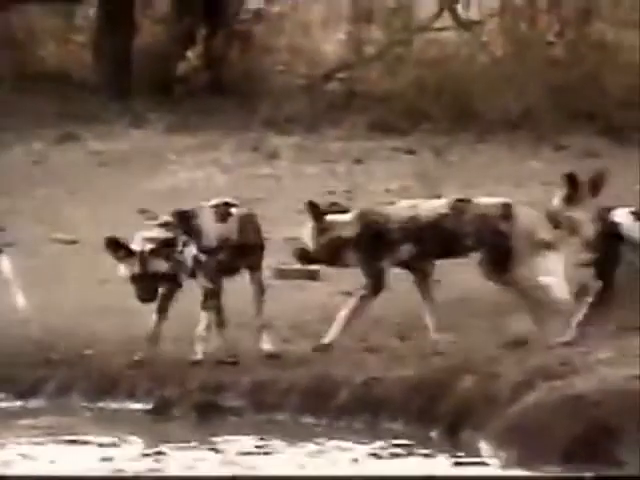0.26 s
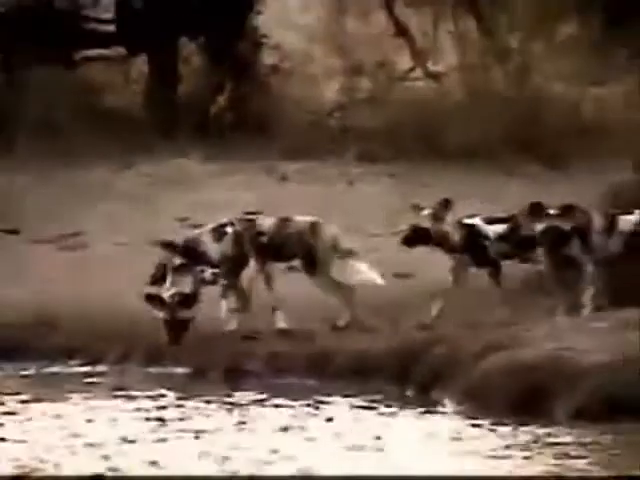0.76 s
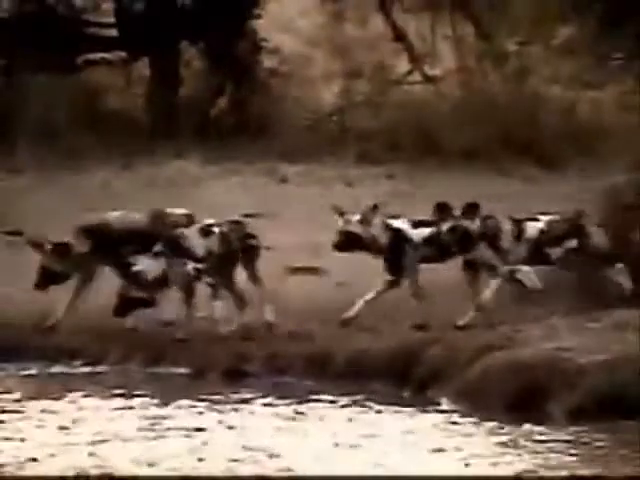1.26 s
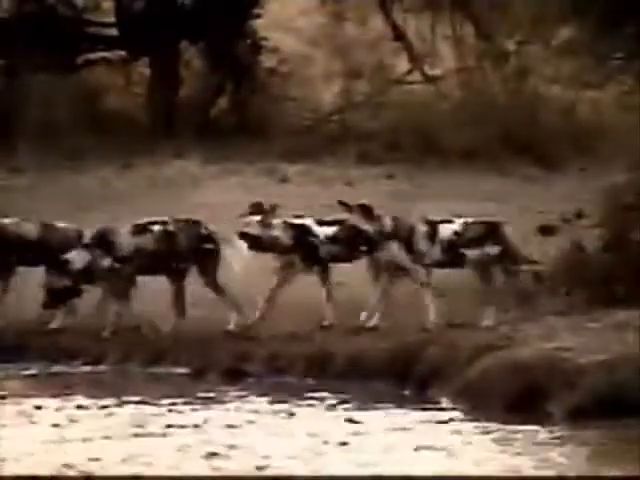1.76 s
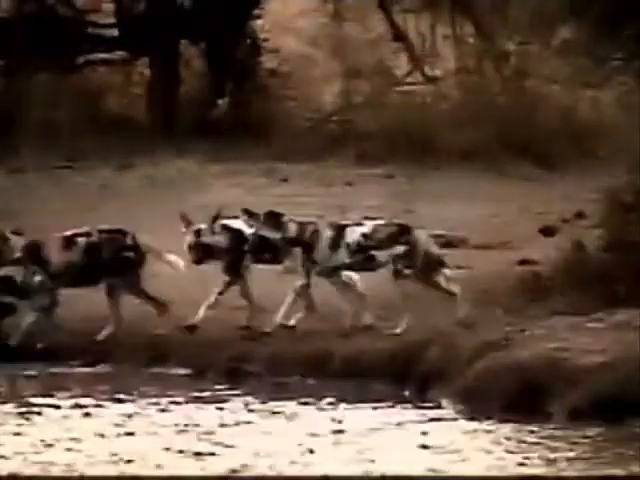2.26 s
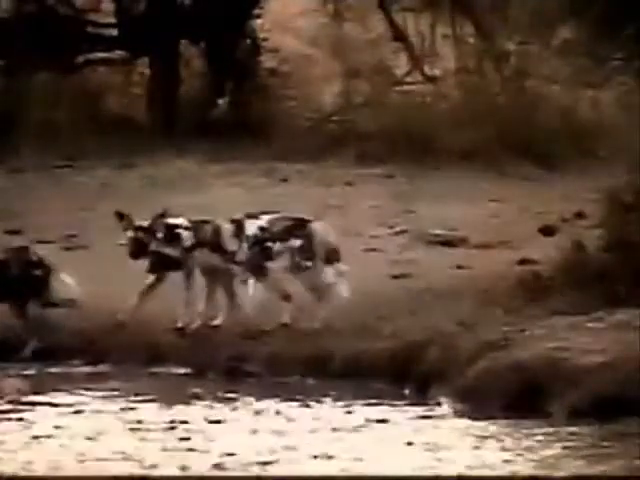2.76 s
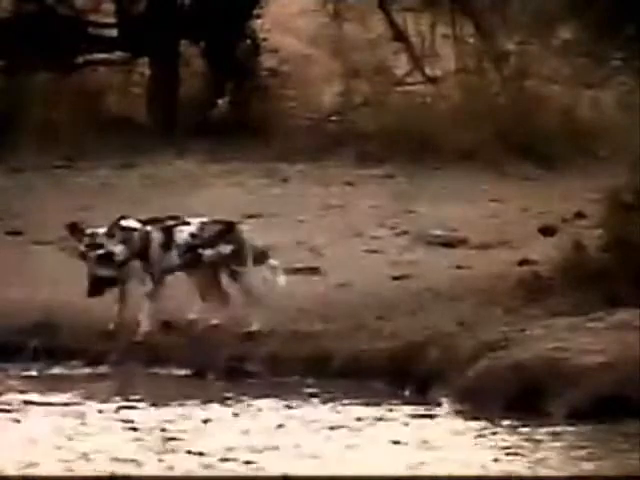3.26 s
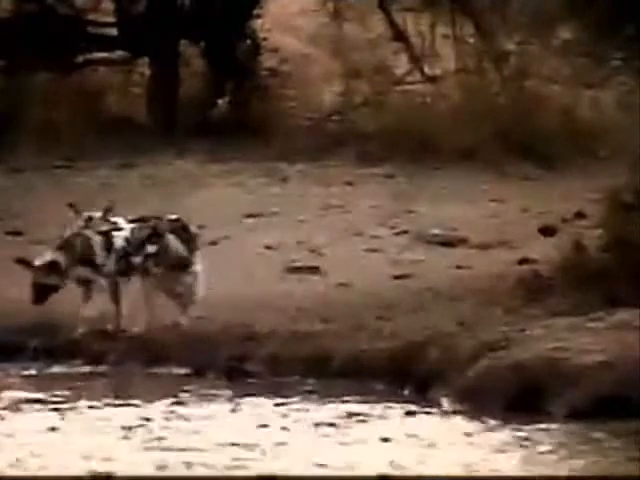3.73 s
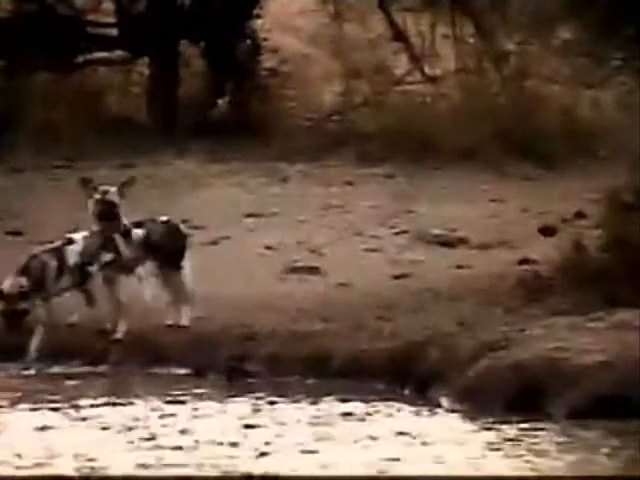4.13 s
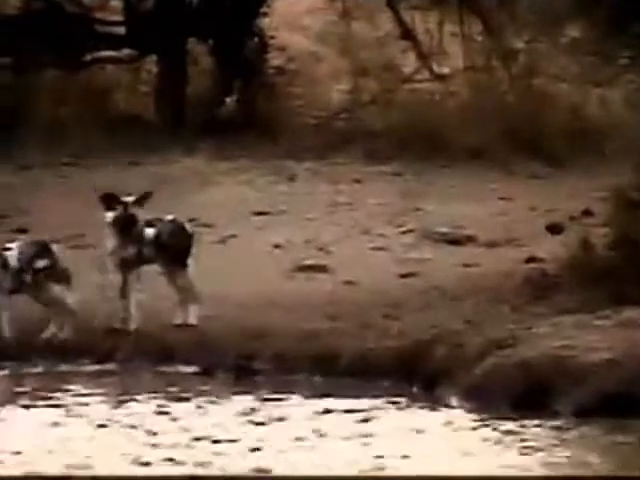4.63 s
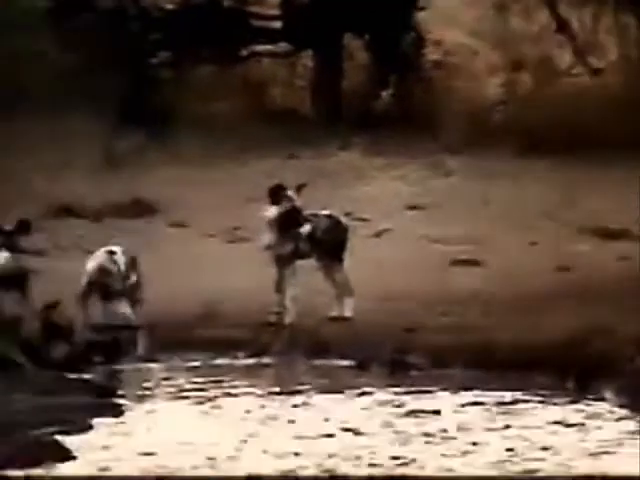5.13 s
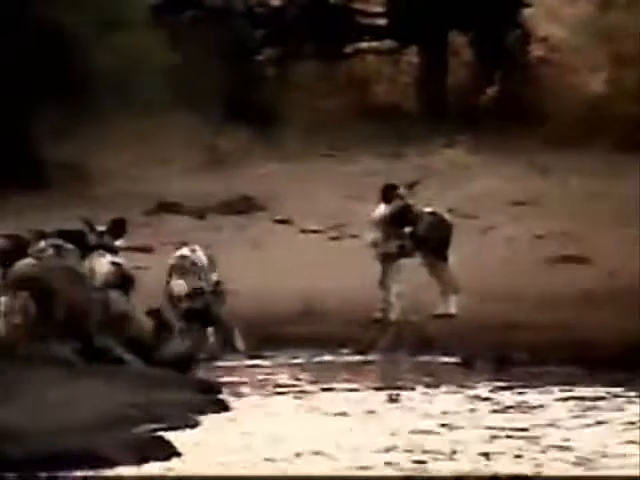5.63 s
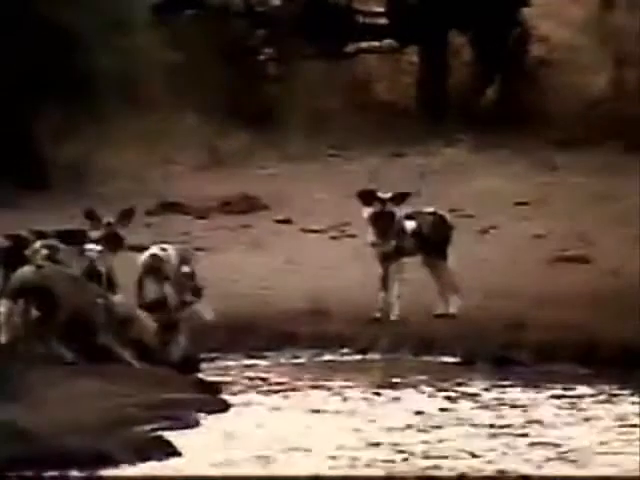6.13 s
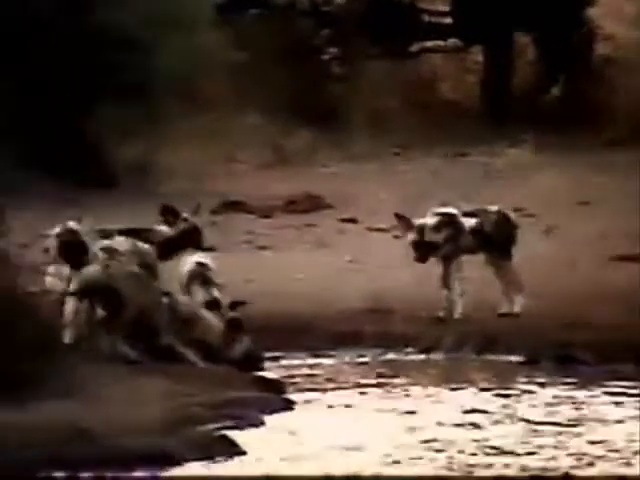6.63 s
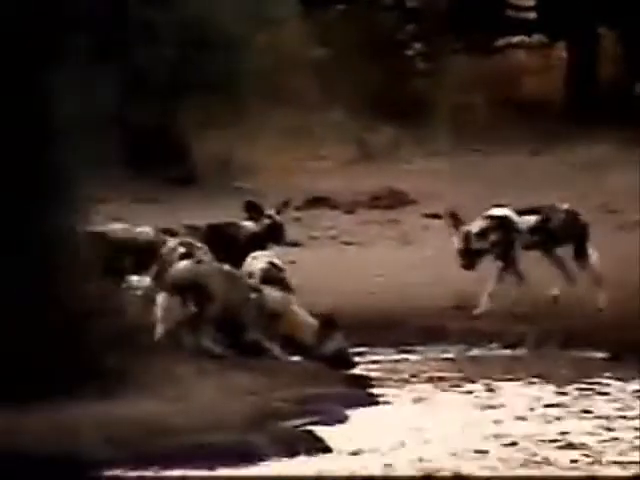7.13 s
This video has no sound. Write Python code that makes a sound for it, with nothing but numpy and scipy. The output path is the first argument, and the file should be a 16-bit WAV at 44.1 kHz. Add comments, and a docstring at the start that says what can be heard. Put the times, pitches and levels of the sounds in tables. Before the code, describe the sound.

A pack's high, raspy squeaks flicker rapidly over faint distant chatter and low whining. A few strong chirps stand out early, quieter calls follow, a bright cluster comes near three seconds, and after a brief lull the twittering builds to its loudest at the end. Open bank with a scattered, bushy echo, heard through a thin, midrange-heavy microphone with low hiss and a weak electrical buzz. No clear water or footsteps.

```python
"""Wild dogs twittering at a waterhole

A pack of wild dogs twitters: peeps paired with steep slides, low whimpers, farther chatter.
Each call is a gliding tone roughened by narrow-band noise; sparse random echoes surround it.
A narrow, peaky microphone line with a faint buzz carries the calls and bends their peaks lopsidedly;
a coarse sample-and-hold leaves mirror images of every squeak in the treble."""
import sys
import numpy as np
from scipy import signal
from scipy.io import wavfile
from scipy.ndimage import uniform_filter1d

SR = 44100
rng = np.random.default_rng(int(sys.argv[2]) if len(sys.argv) > 2 else 0)


def inscribe(sig):
    """Save sig as 16-bit PCM at rate SR to the path in sys.argv[1].

    A 1-D sig is mono; a 2-D sig holds one channel per row.
    Samples are clipped to [-1, 1] before scaling.
    """
    pcm = np.round(np.clip(np.atleast_2d(sig).T, -1, 1) * 32767)
    wavfile.write(sys.argv[1], SR, pcm.astype(np.int16))


N = 325899


def near_dogs():
    """Superposition: the twitters and whimpers of the closest dogs add as pressures."""
    out = np.zeros(N)
    calls = twitters() + whimpers()
    for (middle_s, db, hz, fall_hz, ms), chance in zip(calls, complex_noise(count=len(calls))):
        sound = squeak(hz + fall_hz / 2, hz - fall_hz / 2, ms, chance, rough=0.36)
        add(out, middle_s - len(sound) / SR / 2, gain_of(db) * sound)
    return out


def twitters():
    """Paired glides: a nearly level peep and a steep slide close together, mostly the peep first,
    with weaker slides of chance pitch around them.

    Returns calls as (middle s, dB, middle Hz, fall Hz, ms)."""
    # Twitters ahead of the microphone line. Each row: peep middle in seconds, peep level in dB,
    # peep pitch in Hz, peep length in ms, lag of the slide's middle in ms (negative leads),
    # slide level in dB, slide middle in Hz.
    twitter_rows = [(0.062, -23.5, 2625, 20, 7, -18.5, 3550), (0.08, -19.5, 2827, 15, 13.5, -26.5, 2700),
                    (0.362, -23.5, 2905, 30, -15, -15, 3450), (0.48, -31, 3576, 51, 23.5, -31, 3400),
                    (0.593, -15, 2580, 27, 23.5, -13, 3065), (1.309, -34, 3290, 21, 5, -37, 3190),
                    (1.428, -25, 2525, 17, 24, -25, 2840), (1.841, -26, 3285, 14, 3, -36, 3200),
                    (1.945, -29.5, 3610, 30, -3, -29.5, 2930), (2.031, -27.5, 2610, 30, 16, -20.5, 2900),
                    (2.298, -29, 3310, 22, 2, -43, 2674), (2.391, -26.5, 2840, 31, 10.5, -32, 3000),
                    (2.568, -40, 2600, 20, 8.5, -20.5, 3370), (2.905, -24, 2590, 17, 12.5, -12, 3290),
                    (2.932, -24, 2927, 43, -8, -20, 2715), (3.069, -18.5, 2707, 18, 16.5, -13, 2870),
                    (3.253, -16, 2890, 16, 9.5, -12.5, 2650), (3.277, -23, 2703, 8.2, 67.5, -24, 3300),
                    (3.578, -27, 2800, 20, 13.5, -20.5, 3000), (4.149, -32, 3300, 15, 10.5, -22.5, 2900),
                    (4.336, -26.5, 3350, 15, 12, -19.5, 2950), (4.46, -22, 2540, 21, -27.5, -18, 3000),
                    (4.601, -24.5, 2390, 20, 13, -17, 2960), (4.719, -28, 2930, 20, 14, -20.5, 3100),
                    (4.835, -20.5, 2550, 16, 11.5, -16, 2950), (4.942, -21.5, 2677, 20, 13, -13.5, 3240),
                    (5.057, -21.5, 2545, 45, 5, -15, 2950), (5.07, -28, 2600, 20, 13, -16.5, 2980),
                    (5.205, -19.5, 3200, 20, 2.5, -28, 3200), (5.231, -15.5, 2572, 16, 12, -18, 3240),
                    (5.345, -16.5, 2555, 20, 11, -18, 3345), (5.471, -23.5, 2700, 25, 16.5, -20.5, 3000),
                    (5.53, -9, 2565, 24, 10.5, -13.5, 3340), (5.548, -14, 2795, 16, 9.5, -31, 3000),
                    (5.629, -17.5, 2560, 42, -24, -16.5, 2950), (5.633, -21, 3040, 45, 13.5, -13, 2910),
                    (5.751, -11.5, 2622, 16, 12, -13.5, 3200), (5.84, -21, 3590, 37, 26.5, -19, 2960),
                    (5.847, -20, 2640, 20, 10.5, -5, 3340), (5.953, -20, 3470, 20, 30, -23, 2900),
                    (5.958, -20, 2592, 16, 11, -7, 3520), (5.98, -19.5, 3000, 27, -1, -25, 3350),
                    (6.068, -18, 2710, 12, 25, -16, 3360), (6.08, -10, 2647, 20, 16.5, -14, 3010),
                    (6.196, -14, 2640, 19.5, 19, -10, 2680), (6.222, -19, 2923, 35, 10, -21, 3400),
                    (6.33, -19.5, 2400, 20, 26, -15, 2950), (6.448, -11.5, 2536, 24, 17, -16, 2750),
                    (6.556, -22, 2465, 21, -1.5, -18, 3640), (6.597, -13.5, 2610, 26, 18.5, -26, 2690),
                    (6.723, -13, 2554, 20, 6.5, -16.5, 3690), (6.8, -19, 2470, 45, 24, -25, 2900),
                    (6.958, -18.5, 2667, 19.6, 7.5, -14.5, 3520), (7.085, -6.5, 2690, 18, 10.5, -20, 3580),
                    (7.098, -20, 2558, 55, 5.5, -19, 2950), (7.229, -13.5, 2710, 20, 22, -14, 3360),
                    (7.245, -9, 2650, 24, 45.5, -19, 2650), (7.26, -5.5, 2715, 17.8, 18, -7.5, 2900)]
    peep_sag_hz, slide_fall_hz, slide_ms = 149.8, 851, 16
    extra_db, extra_s, extra_low_hz, extra_high_hz, extra_ms = -12.5, 0.026, 2797, 3708, 20
    calls = []
    for s, peep_db, peep_hz, peep_ms, lag_ms, slide_db, slide_hz in twitter_rows:
        calls.append((s, peep_db, peep_hz, peep_sag_hz, peep_ms))
        calls.append((s + lag_ms / 1000, slide_db, slide_hz, slide_fall_hz, slide_ms))
        for late, pitch, glide in rng.random((2, 3)):
            # the later after the peep's middle, the weaker
            db = max(peep_db, slide_db) + extra_db * (0.5 + late)
            hz = extra_low_hz + (extra_high_hz - extra_low_hz) * pitch
            calls.append((s + extra_s * late, db, hz, slide_fall_hz * glide, extra_ms))
    return calls


def whimpers():
    """Level and duration trade off: below -20 dB, the softer a whimper is, the longer it is drawn out.

    Returns calls as (middle s, dB, middle Hz, fall Hz, ms)."""
    # Low whimpers ahead of the microphone line. Each row: middle in seconds, level in dB,
    # middle pitch in Hz, fall over the call in Hz (negative rises).
    whimper_rows = [(0.243, -29.5, 1680, 44), (0.511, -30.5, 1700, -3), (0.612, -12.5, 2225, 903),
                    (0.818, -28.5, 1790, 595), (0.935, -30, 1940, 95), (1.004, -30, 1715, -6),
                    (1.055, -28, 2190, 16), (1.208, -27, 1625, -100), (1.309, -28.5, 2180, 35),
                    (1.435, -24.5, 2210, 804), (1.49, -27, 1690, -200), (2.089, -27, 1580, 470),
                    (2.298, -22, 2180, -240), (2.356, -27.5, 1690, -150), (2.468, -29.5, 1700, -200),
                    (2.579, -25, 1800, 797), (2.903, -24.5, 1240, 72), (3.071, -23.5, 1220, 48),
                    (3.091, -22.5, 1700, -500), (3.253, -19.5, 1590, 504), (3.576, -20.5, 1600, 552),
                    (3.593, -29.5, 1655, 13), (3.714, -34.5, 1705, 6), (4.163, -24.5, 1800, 745),
                    (4.414, -18.5, 1510, 236), (4.437, -27, 1620, 143), (4.595, -25, 2125, 218),
                    (4.612, -21, 2050, 902), (4.64, -25.5, 2030, 200), (4.7, -27.5, 1600, 102),
                    (4.865, -20.5, 1655, -100), (5.066, -22, 1930, -400), (5.494, -19.5, 1700, 446),
                    (5.645, -18.5, 1940, 907), (5.862, -21.5, 1695, 110), (5.984, -17, 1670, -220),
                    (6.057, -27, 1680, -8), (6.335, -24, 1710, -2), (6.354, -19.5, 2050, 708),
                    (6.57, -15.5, 2160, -200), (6.61, -15.5, 2110, 964), (6.709, -19.5, 2165, 8),
                    (6.741, -17, 2020, 837), (6.815, -18, 2170, 1203), (6.841, -23, 1650, 400),
                    (6.918, -25.5, 1770, 493), (7.188, -26.5, 1645, 55), (7.105, -21, 2200, 704.5),
                    (7.279, -31, 2150, 495), (7.357, -31, 1600, 102)]
    shortest_ms, drawn_ms_per_db = 21, 2
    return [(s, db, hz, fall_hz, shortest_ms + drawn_ms_per_db * max(-20 - db, 0))
            for s, db, hz, fall_hz in whimper_rows]


def squeak(start_hz, end_hz, ms, chance, rough, spread_hz=550, outlast=1.9):
    """Frequency glide of the folds; turbulent air modulates it into noise around the same pitch."""
    # the rough part outlasts the clean tone, and the glide runs on through it
    t = np.arange(min(round(outlast * ms * SR / 1000), len(chance) // 2)) / SR
    middle = t - t[-1] / 2
    progress = middle * 1000 / ms  # -0.5 to 0.5 over the clean tone
    hz = (start_hz + end_hz) / 2 + (end_hz - start_hz) * progress
    carrier = np.exp(2j * np.pi * (np.cumsum(hz) / SR + chance[0].real))
    # two running means make the noise slow, so that it stays close to the pitch
    width = round(SR / spread_hz / 3)
    flutter = uniform_filter1d(uniform_filter1d(chance[:len(t)], width), width)
    flutter = flutter / np.sqrt(np.mean(abs(flutter) ** 2))
    clean = np.cos(np.pi * np.clip(progress, -0.5, 0.5)) ** 2
    return (carrier * (clean + rough * flutter * np.hanning(len(t)))).real


def complex_noise(count):
    """Circular Gaussian noise: independent real and imaginary parts, one row for each squeak."""
    return rng.standard_normal((count, 8000)) + 1j * rng.standard_normal((count, 8000))


def far_pack():
    """Masking: high twitter and lower whimpers of farther dogs, each mixed with rustling air noise."""
    # Level curves ahead of the mix and the microphone line. Each row: time in seconds,
    # relative level of the high twitter in dB, relative level of the low whimpers in dB.
    pack_levels = [(0.0, -39, -49), (0.6, -44, -47), (1.2, -45.5, -49.5), (1.7, -43, -48.5),
                   (2.2, -43, -48), (2.8, -41, -47.5), (3.3, -37.5, -51), (3.9, -42.5, -47),
                   (4.5, -35, -50.5), (4.8, -40.5, -45), (5.2, -39.5, -48), (5.7, -38, -43.5),
                   (6.3, -36.5, -52.5), (6.6, -36.5, -46.5), (6.95, -40, -48), (7.39, -31.5, -51)]
    s, high_db, low_db = np.transpose(pack_levels)
    t = np.arange(N) / SR
    air = rng.standard_normal(N)
    rustle = signal.lfilter(*signal.butter(2, 2300, fs=SR), air)
    high = 1.02 * chatter(2200, 3750, 347.4, 0.65, count=250) + 2.05 * air
    low = 3.05 * chatter(1149.7, 2250, 146.0, 3.7, count=250) + 6.6 * rustle
    high_gain = gain_of(np.interp(t, s, high_db))
    low_gain = gain_of(np.interp(t, s, low_db))
    return high_gain * high + low_gain * low


def chatter(low_hz, high_hz, half_fall_hz, spread_db, count):
    """Random superposition: many rough squeaks of uneven strength within a range of pitch."""
    out = np.zeros(N)
    for (at, pitch, glide, size, length), chance in zip(rng.random((count, 5)), complex_noise(count)):
        hz = low_hz + (high_hz - low_hz) * pitch
        bend_hz = half_fall_hz * glide
        sound = squeak(hz + bend_hz, hz - bend_hz, 14 + 22 * length, chance, rough=1.0)
        db = -spread_db * np.log(1 - 0.98 * size)  # exponential spread: few squeaks stand out
        add(out, at * N / SR, gain_of(db) * sound)
    return evened(out)


def echoes(x, t60=0.16, first_ms=4.0):
    """Diffuse scattering from the bank and bushes: sparse taps of random sign, decaying 60 dB in t60 s."""
    taps = np.zeros(SR // 2)
    at = np.arange(0, len(taps) - 22, 22)
    at = at + rng.integers(0, 22, len(at))  # one tap at random in every half millisecond
    decay = gain_of(-60 * at / SR / t60)
    taps[at] = rng.choice([-1.0, 1.0], len(at)) * decay * (at > first_ms * SR / 1000)
    return signal.oaconvolve(x, taps / np.linalg.norm(taps))[:N]


def microphone_line(x):
    """Linear filtering: a narrow, peaky passband colours all that the microphone hears."""
    # Response of the line. Each row: frequency in Hz, gain in dB.
    line_response = [(1080, -28), (1240, -16), (1430, -17.5), (1550, -8.5), (2250, -11.5), (2600, -1.5),
                     (2720, -1.5), (2850, -7), (2950, -3.5), (3130, -14), (3290, -6), (3600, -10.5),
                     (3850, -21.5), (4000, -61.5)]
    return colour(x, line_response)


def line_buzz(wavers):
    """Additive synthesis: steady buzz and hum tones whose levels waver a little."""
    # Tones on the line. Each row: frequency in Hz, rms level in dB about which it wavers.
    buzz_tones = [(119, -76.5), (479, -81.5), (1700, -57), (1800, -84), (1900, -62), (2100, -61.5),
                  (2400, -61), (2500, -54), (2600, -53.5), (2700, -53.5), (2800, -56), (2900, -72),
                  (3300, -68)]
    t = np.arange(N) / SR
    waver_db = 2.5
    out = np.zeros(N)
    for (hz, db), waver, phase in zip(buzz_tones, wavers(len(buzz_tones)), rng.random(len(buzz_tones))):
        tone = np.sin(2 * np.pi * (hz * t + phase))
        out += np.sqrt(2) * gain_of(db + waver_db * waver) * tone
    return out


def far_coo():
    """Amplitude envelope: one faint pure tone that rises quickly and fades slowly."""
    # One far coo: start in seconds, end in seconds, pitch in Hz, peak level in dB.
    coo_call = (2.41, 2.68, 485, -67)
    start, end, hz, db = coo_call
    t = np.arange(N) / SR
    progress = np.clip((t - start) / (end - start), 0, 1)
    return gain_of(db) * np.sin(2 * np.pi * hz * t) * np.sin(np.pi * np.sqrt(progress))


def treble_hiss(wavers):
    """Band-limited noise: a thin treble hiss that swells and sinks."""
    # Band of the hiss: low edge in Hz, high edge in Hz, rms level in dB about which it swells.
    hiss_band = (4680, 7250, -69.5)
    low_hz, high_hz, db = hiss_band
    band = signal.butter(3, [low_hz, high_hz], "bandpass", fs=SR, output="sos")
    treble = signal.sosfilt(band, rng.standard_normal(N))
    swell_db = 4.5
    return gain_of(db + swell_db * wavers(1)[0]) * evened(treble)


def low_hiss():
    """Coloured noise: a steady rumble and low hiss shaped by a gain curve."""
    # Spectrum of the noise. Each row: frequency in Hz, relative level in dB.
    hiss_spectrum = [(15, -15), (25, -53), (119, -0.5), (273, -8), (477, 2), (639, -7), (1000, -6.5),
                     (1300, 9.5), (2200, -120)]
    return gain_of(-66.5) * evened(colour(rng.standard_normal(N), hiss_spectrum))  # rms dB


def slow_chance(count):
    """Low-passed noise: rows of slowly wandering values, rms 1 over all rows."""
    step = 441  # 10 ms in samples
    chance = rng.standard_normal((count, N // step + 2))
    wander = evened(uniform_filter1d(chance, 15, axis=1))  # running mean over 150 ms
    return [np.interp(np.arange(N), np.arange(len(row)) * step, row) for row in wander]


def colour(x, points):
    """Minimum-phase filtering: causal taps follow the gain curve of (Hz, dB) points."""
    f, db = np.transpose(points)
    hz = np.abs(np.fft.fftfreq(8192, 1 / SR))
    log_gain = np.log(gain_of(np.interp(np.log(hz + 1), np.log(f), db)))
    phase = -signal.hilbert(log_gain).imag  # the log gain fixes the phase
    taps = np.fft.ifft(np.exp(log_gain + 1j * phase)).real[:4096]
    return signal.oaconvolve(x, taps)[:N]


def gain_of(db):
    """Logarithmic level: decibels to amplitude, 20 dB for each factor of ten."""
    return 10 ** (np.asarray(db) / 20)


def evened(x):
    """Normalisation of mean power: scales to rms 1."""
    return x / np.sqrt(np.mean(x ** 2) + 1e-20)


def add(mix, s, sound):
    """Superposition: adds a sound into the mix from s seconds on."""
    part = mix[max(round(s * SR), 0):][:len(sound)]
    part += sound[:len(part)]


def scene():
    """Sound field and transmission: near and far dogs with echoes, then the line and its noises."""
    near, far = near_dogs(), far_pack()
    near_echoes = gain_of(-6) * echoes(near)
    far_echoes = 0.53 * echoes(far + 0.13 * near, t60=0.5)
    air = near + near_echoes + 0.78 * far + far_echoes
    noises = line_buzz(slow_chance) + far_coo() + treble_hiss(slow_chance) + low_hiss()
    return (microphone_line(air) + noises)[None]


def record(dry):
    """Even-order distortion and imaging: lopsided peaks, a held coarser sampling, then a band limit."""
    folded = abs(dry) ** 1.71  # one-sided bending makes the octave of each squeak and a low thump
    octave_band = signal.butter(2, [5050, 5700], "bandpass", fs=SR, output="sos")
    octave = signal.sosfilt(octave_band, folded)
    thump = signal.lfilter(*signal.butter(1, 90, "highpass", fs=SR), folded)
    bent = dry + 0.0053 * thump + 0.4 * octave
    hold_hz, edge_hz = 32000, 15430
    coarse = signal.resample_poly(bent, 320, 441, axis=1)  # SR to hold_hz
    index = np.minimum(np.arange(N) * hold_hz // SR, coarse.shape[1] - 1)
    held = coarse[:, index]  # each value is held until the next
    low_pass = signal.firwin(511, edge_hz, window=("kaiser", 9), fs=SR)
    return signal.oaconvolve(held, low_pass[None], "same")


dry = scene()
out = record(dry)
inscribe(out)
```